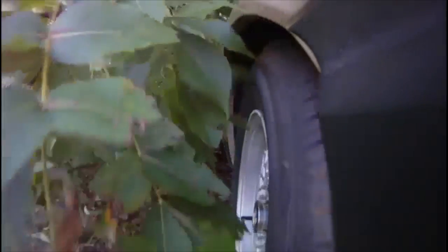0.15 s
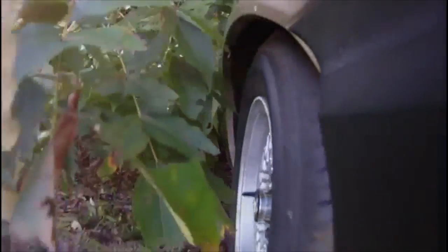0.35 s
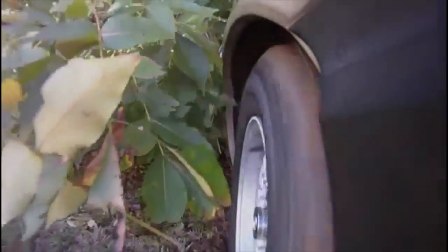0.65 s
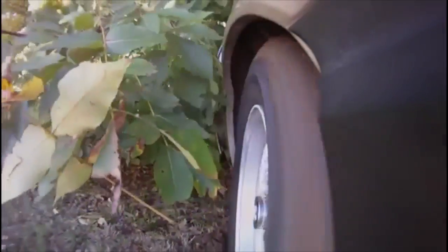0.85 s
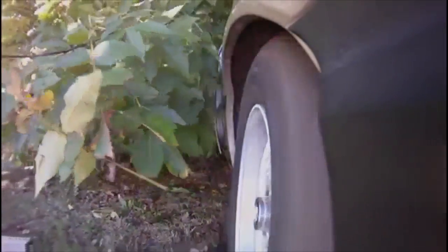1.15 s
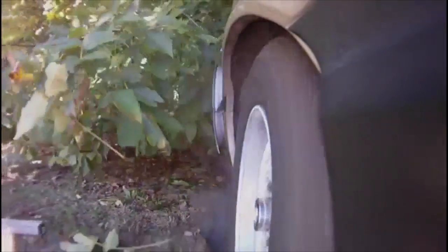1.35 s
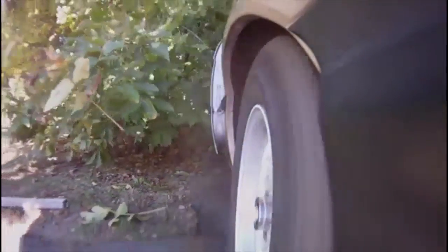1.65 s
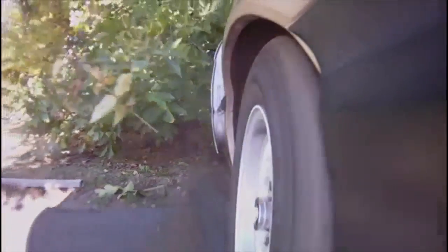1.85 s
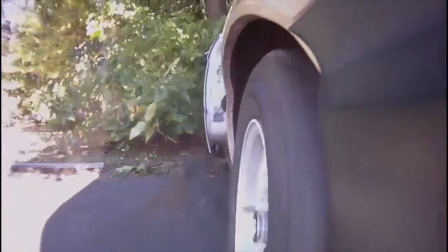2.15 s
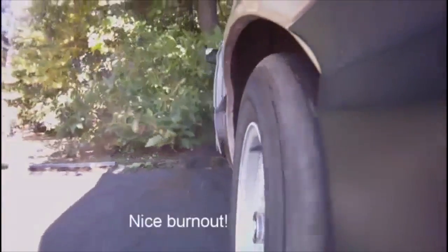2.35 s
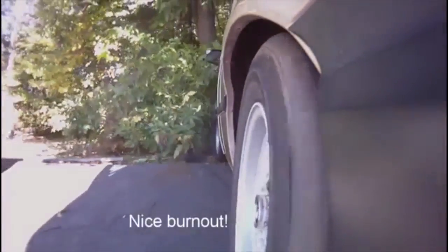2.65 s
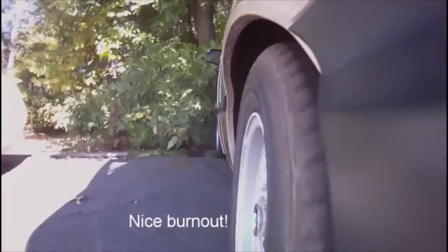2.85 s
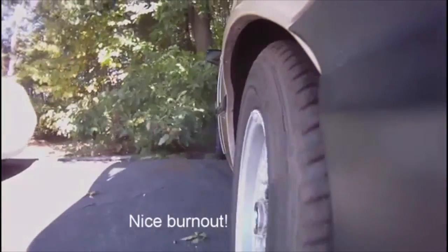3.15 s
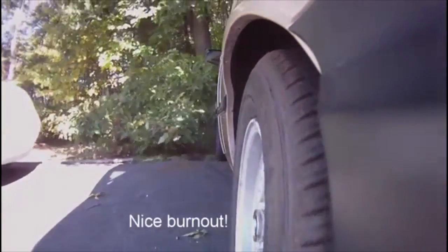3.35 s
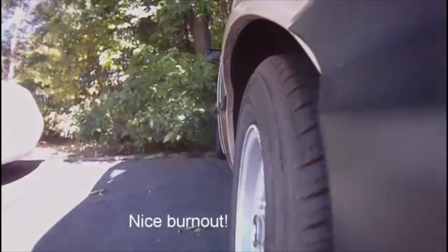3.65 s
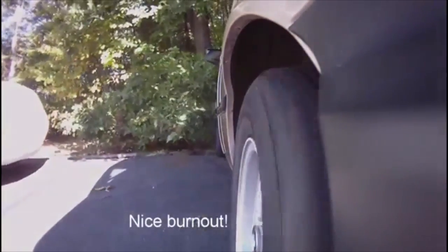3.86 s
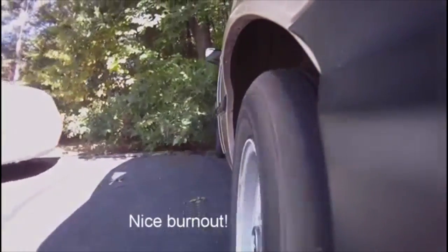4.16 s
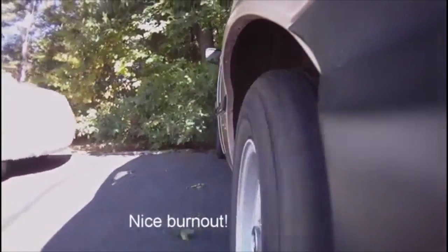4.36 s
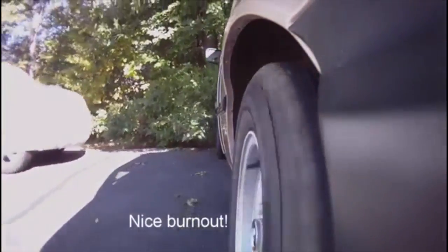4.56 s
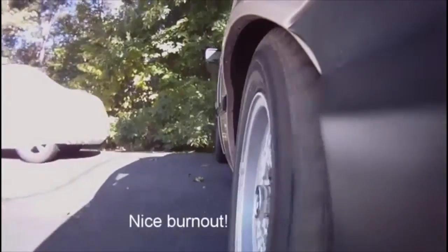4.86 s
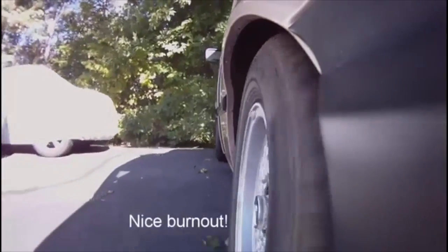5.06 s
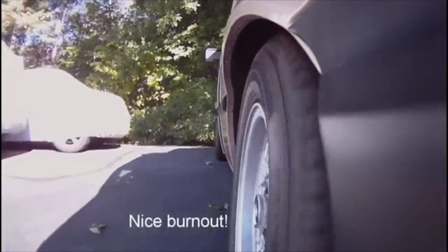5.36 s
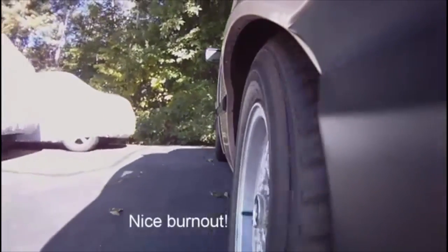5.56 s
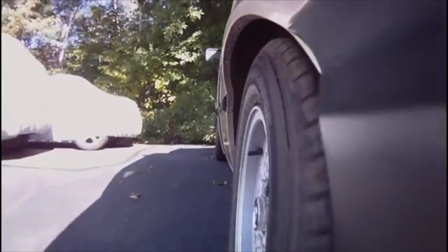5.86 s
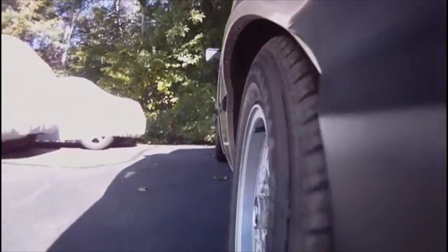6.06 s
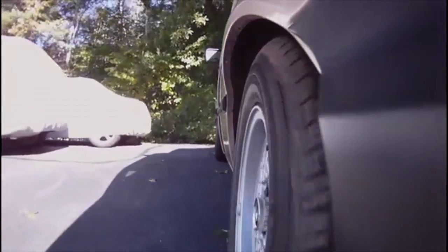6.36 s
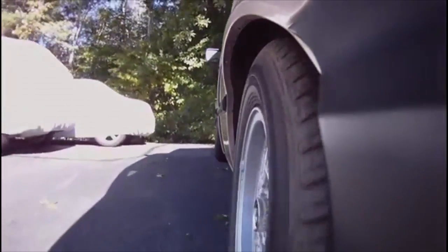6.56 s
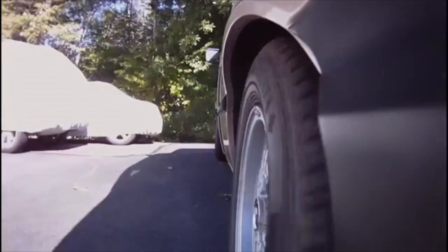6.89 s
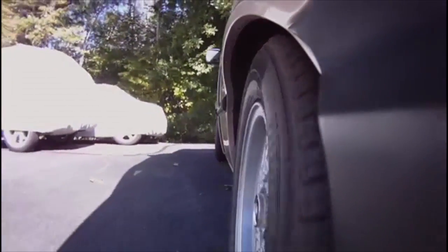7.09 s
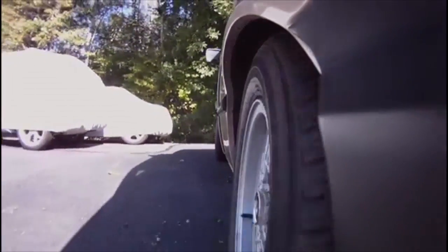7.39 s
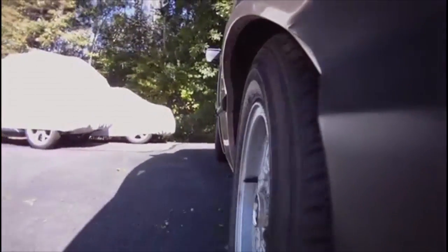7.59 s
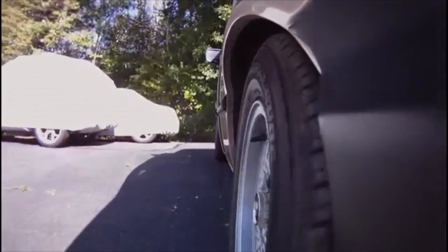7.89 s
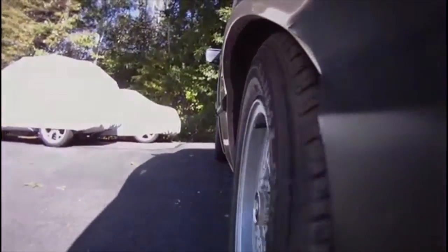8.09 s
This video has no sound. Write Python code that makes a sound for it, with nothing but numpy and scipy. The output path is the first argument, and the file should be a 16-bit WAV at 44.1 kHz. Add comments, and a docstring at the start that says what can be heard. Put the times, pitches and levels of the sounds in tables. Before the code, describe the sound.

A tyre loses grip twice on asphalt, with the microphone right by the wheel arch. Rumble and rasping rubber build into a piercing, unsteady, distorted squeal lasting about a second, ending in thumps and stone cracks. After a short lull comes a briefer, clearer squeal with a juddering start and finish. Then soft patchy grit crunch, faint whine, pump hum and hiss continue.

```python
"""Wheelspin on asphalt, heard just behind the wheel

An electric car's tread scrubs (grainy noise), then squeals (unsteady sines) and overloads the microphone.
A second, juddering squeal follows. Stones crack and ring; the car rolls over grit (patchy noise) with whine,
and motor and pump hum (harmonics) over rumble, deep rumble and hiss (filtered noise)."""
import sys
import numpy as np
from scipy import signal
from scipy.fft import rfft, irfft, next_fast_len
from scipy.io import wavfile

SR = 44100
rng = np.random.default_rng(int(sys.argv[2]) if len(sys.argv) > 2 else 0)


def unload_audio(sound):
    """Save the sound as a 16-bit wav file, at the path given as the first command line argument."""
    columns = np.transpose(np.atleast_2d(sound))
    # keep every value between -1 and 1, then stretch to whole-number steps
    steps = np.round(np.clip(columns, -1, 1) * 32767)
    wavfile.write(sys.argv[1], SR, steps.astype(np.int16))


N = 362943
TIME = np.arange(N) / SR
FULL_SLIDE_DB = -14  # reference slide strength

# strength of rolling on grit: start_s, level_db
ROLL_LEVEL = [(.33, -55), (.38, -47.5), (.55, -50.5), (.7, -37), (2.4, -40.5), (2.7, -46), (3.0, -43.5),
              (3.35, -55.5), (3.75, -57), (3.9, -37.5), (4.9, -39.5), (6.2, -45), (7.25, -41.5), (7.5, -47),
              (8.23, -47.5)]


def from_db(db):
    """Decibels to gain."""
    return 10 ** (np.asarray(db) / 20)


def rms_one(x):
    """Scale to unit power."""
    return x / np.sqrt(np.mean(x ** 2) + 1e-20)


def in_time(*tables):
    """Join tables end to end and interpolate each column at every sample."""
    s, *columns = np.vstack(tables).T
    return [np.interp(TIME, s, c) for c in columns]


def drift(corner_hz):
    """Smooth random signal of unit power, low-passed around corner_hz, made at SR / 16."""
    hz = np.arange(N // 32 + 1) * SR / (N // 16 * 16)
    spectrum = rfft(rng.standard_normal(N // 16))[:len(hz)]
    slow = irfft(spectrum / (1 + (hz / corner_hz) ** 2))
    return np.interp(np.arange(N) / 16, np.arange(len(slow)), rms_one(slow))


def noise(colour):
    """Noise of unit power with the given spectrum, falling away below its first point."""
    size = next_fast_len(N, real=True)
    hz, db = np.transpose(colour)
    bins_hz = np.maximum(np.arange(size // 2 + 1) * SR / size, 1)
    gain = from_db(np.interp(np.log(bins_hz), np.log(hz), db))
    gain = gain * np.minimum(bins_hz / hz[0], 1)
    return rms_one(irfft(rfft(rng.standard_normal(size)) * gain, size)[:N])


def resonances(modes):
    """Random friction rings narrow modes, each given as centre_hz, width_hz, level_db."""
    size = next_fast_len(N, real=True)
    bins_hz = np.arange(size // 2 + 1) * SR / size
    power = 0
    for hz, width_hz, db in modes:
        peak = rms_one(1 / (1 + ((bins_hz - hz) / width_hz) ** 2))
        power = power + from_db(2 * db) * peak ** 2
    return irfft(rfft(rng.standard_normal(size)) * np.sqrt(power), size)[:N]


def turn(hz):
    """Phase in radians of an oscillation whose frequency moves."""
    return 2 * np.pi * np.cumsum(hz) / SR


def slip(hz, spread):
    """Phase of rubber that sticks and slips at an unsteady rate."""
    return turn(hz * (1 + spread * (.6 * drift(18) + .8 * drift(162.75))))


def ring(push, hz, t60_s):
    """Two-pole resonator: a unit click starts a decaying sine of initial height 1."""
    r = from_db(-60 / (t60_s * SR))
    w = 2 * np.pi * hz / SR
    return signal.lfilter([0, np.sin(w)], [1, -2 * r * np.cos(w), r * r], push + 1e-18)


def swell(start_s, end_s, attack_s, release_s):
    """Gain that rises linearly, holds until the end and dies away exponentially."""
    rise = np.clip((TIME - start_s) / attack_s, 0, 1)
    return rise * np.exp(-np.maximum(TIME - end_s, 0) / release_s)


def arch(x):
    """Short reflections between road, wheel and arch comb the spectrum; power stays about the same."""
    # delay_s, gain (linear)
    reflections = [(.0023, -0.019), (.0037, -0.073), (.0061, 0.15), (.0094, -0.12), (0.0149, .2),
                   (0.0209, 0.037)]
    echoes = sum(gain * np.pad(x, (round(delay_s * SR), 0))[:N] for delay_s, gain in reflections)
    return (x + echoes) / np.sqrt(1 + sum(gain ** 2 for _, gain in reflections))


def slide_db():
    """How hard the rubber slides; drives scrub, squeal, rumble and motor."""
    # one table per wheelspin: start_s, level_db
    long_slide = [(.6, -61.5), (.82, -28.5), (1.06, -31), (1.36, -17), (1.6, -14), (2.07, -14),
                  (2.268, -21.5), (2.3, -34.5), (2.38, -45.5), (2.8, -57)]
    short_slide = [(3.77, -67), (3.822, -26.5), (3.972, -19.5), (4.288, -16.5), (4.49, -19.5),
                   (4.558, -26.5), (4.588, -42.5), (4.8, -69.5)]
    return in_time(long_slide, short_slide)[0]


def stick_slip_hz():
    """Stick-slip rate of the tread through both squeals."""
    # one table per squeal: start_s, pitch_hz
    spin_pitch = [(1.395, 1337), (1.426, 1092), (1.464, 1102), (1.544, 1228), (1.618, 1084), (1.685, 1201),
                  (1.83, 1113), (1.922, 1257), (2.034, 1072), (2.3, 1131)]
    hop_pitch = [(3.83, 1137), (4.097, 1159), (4.262, 1047), (4.31, 1077), (4.42, 1122), (4.499, 1107),
                 (4.578, 1175)]
    return in_time(spin_pitch, hop_pitch)[0]


def road_contact():
    """The tyre bounces as it loses or regains grip: a gain that dips at every hop."""
    # highest_hop_s, dip_db, dying_s (fade on both sides)
    judders = [(2.241, 17, 0.052), (3.87, 26, 0.11), (4.306, 3, 0.16), (4.525, 10.5, 0.055)]
    hop_period_s, hop_half_length_s = .071, 0.017
    dip_db = 0
    for s, db, dying_s in judders:
        from_hop_s = (TIME - s + hop_period_s / 2) % hop_period_s - hop_period_s / 2
        dying = ((TIME - s) / dying_s) ** 2
        hop = (from_hop_s / hop_half_length_s) ** 2
        dip_db = dip_db + db * np.exp(-dying - hop)
    return from_db(-dip_db)


def singing_tread():
    """Gains of fundamental, octave and neighbouring patches, and the share left as rasp."""
    # start_s, end_s, fundamental_db and octave_db (against the slide), fundamental_fade_db_per_s,
    # rasp_change_db, neighbours_db
    squeals = [(1.27, 1.37, 5.4, -3, 0, -0.5, -3), (1.408, 2.27, 10.65, 11, 12, -1.5, -2),
               (3.827, 4.558, 9.26, 7, 3.5, -5.5, -10)]
    attack_s, release_s = .025, .025
    first, second, crowd = 0, 0, 0
    rasp_db = -1.0  # outside the squeals
    for start_s, end_s, first_db, second_db, fade_db_per_s, change_db, crowd_db in squeals:
        on = swell(start_s, end_s, attack_s, release_s)
        fade_db = fade_db_per_s * np.clip(TIME - start_s, 0, end_s - start_s)
        first = first + on * from_db(first_db - fade_db)
        second = second + on * from_db(second_db)
        crowd = crowd + on * from_db(crowd_db)
        rasp_db = rasp_db + on * change_db
    return first, second, crowd, from_db(rasp_db)


def hiss(level_db=-62.5):
    """Steady background hiss: coloured noise."""
    # freq_hz, density_db (per Hz, relative)
    hiss_colour = [(700, 3.5), (4000, -8), (6000, -4.5), (10000, -0.5), (12000, -8.5), (15000, -17.5)]
    return from_db(level_db) * noise(hiss_colour)


def pump(pulse_hz=35.4, wander=.002, flutter_db=5.5):
    """A small pump at nearly steady speed: fluttering harmonics of its pulse rate."""
    # multiple (of pulse_hz), level_db (rms, before flutter)
    harmonics = [(3, -68.5), (4, -68.5), (5, -70.5), (7, -67), (8, -66.5), (10, -59.5), (11, -64.5),
                 (13, -69), (14, -61), (16, -64.5), (21, -72), (22, -76.5)]
    phase = turn(pulse_hz * (1 + wander * drift(1.8)))
    hum = 0
    for k, db in harmonics:
        gain = from_db(db + flutter_db * drift(1.6))
        hum = hum + gain * np.sin(k * phase + rng.uniform(0, 2 * np.pi))
    return np.sqrt(2) * hum


def rumble(lumpy_db=2.5, release_s=.06):
    """Rolling, sliding and lumpy jolts shake the carcass; a deep low swell sounds under the loudest squeal and
    at two thumps."""
    # freq_hz, density_db (per Hz, relative)
    rumble_colour = [(30, -23), (65, -13.5), (110, -2), (200, -2), (350, 1.5), (580, 2), (750, -8.5),
                     (950, -23), (2000, -42.5)]
    deep_colour = [(15, -7), (40, -2), (70, -7), (150, -15), (600, -16), (1150, -14.5), (1600, -51)]
    # tyre breaking loose, then biting again: start_s, end_s, attack_s, level_db
    jolt_rows = [(.7, 1.2, 0.47, -30.5), (2.485, 2.565, 0.013, -33.5)]
    # low swells: under the loudest squeal and at two thumps: start_s, end_s, attack_s, level_db
    low_swell_rows = [(1.416, 2.03, .35, -48), (2.48, 2.57, 0.052, -45), (8.114, 8.224, 0.076, -45)]
    usual_roll_db = -43
    # level at usual rolling / full slide, and the share of their swing that it follows
    roll_rumble_db, roll_follows = -49.5, 0.92
    slide_rumble_db, slide_follows = -37.5, 0.42

    def swells(rows):
        """Sum of the level swells in a table."""
        return sum(from_db(db) * swell(start_s, end_s, attack_s, release_s)
                   for start_s, end_s, attack_s, db in rows)

    jolted = swells(jolt_rows) * rms_one(from_db(lumpy_db * drift(30)))
    roll_db, = in_time(ROLL_LEVEL)
    rolled = from_db(roll_rumble_db + roll_follows * (roll_db - usual_roll_db))
    slid = from_db(slide_rumble_db + slide_follows * (slide_db() - FULL_SLIDE_DB))
    carcass = np.sqrt(rolled ** 2 + slid ** 2 + jolted ** 2) * noise(rumble_colour)
    return carcass + swells(low_swell_rows) * noise(deep_colour)


def rolling(grain_db=1.5, level_db=0.5, patchy_db=1.35, whine_flutter_db=4.0):
    """Tread crunches over patches of fine grit; drive and wheel whine along with it."""
    # freq_hz, density_db (per Hz, relative)
    roll_colour = [(600, -26), (900, -12.5), (1300, -8), (1600, -6), (2050, 2), (2900, -3.5), (3900, 0.5),
                   (4600, -1), (5200, -17), (6200, -13), (8200, -15), (10500, -18), (11800, -28.5),
                   (15000, -38.5)]
    # narrow tones: centre_hz, width_hz, level_db (against the rolling level, before flutter)
    whine_modes = [(1303, 11, -19), (1148, 10, -23), (2088, 16, -15), (2460, 12, -24.5), (3360, 12, -16.5),
                   (3770, 36, -10), (4446, 14, -26), (4400, 14, -23.5), (5380, 70, -20.5), (6140, 14, -30),
                   (9120, 70, -20.5), (9760, 12, -30.5)]
    texture = from_db(grain_db * drift(250) + patchy_db * drift(12))
    crunch = from_db(level_db) * rms_one(noise(roll_colour) * texture)
    whine = resonances(whine_modes) * from_db(whine_flutter_db * drift(3.7))
    return from_db(in_time(ROLL_LEVEL)[0]) * (arch(crunch) + whine)


def motor(octave_db=3.5, flutter_db=8.5, wander=0.03):
    """Gear teeth hum a note and its octave that follow the wheel speed, louder with harder sliding."""
    # start_s, pitch_hz (before wander)
    gear_note = [(.8, 118), (1.4, 360), (1.7, 432), (2.0, 391.6), (3.1, 170), (3.8, 166.2), (4.08, 301.3),
                 (4.3, 326.3), (4.46, 306), (4.75, 190)]
    full_slide_level_db, follows = -47.5, 0.65  # follows: share of the slide's swing
    hz, = in_time(gear_note)
    db = full_slide_level_db + follows * (slide_db() - FULL_SLIDE_DB)
    phase = turn(hz * (1 + wander * drift(25)))
    note = np.sin(phase) * from_db(flutter_db * drift(13))
    octave = np.sin(2 * phase) * from_db(octave_db + flutter_db * drift(26))
    return from_db(db) * (note + octave)


def stones(crack_s=0.0093, ring_t60_s=.03, level_db=5.0):
    """Stones crack against the wheel arch, which rings briefly at a pitch set by where each lands."""
    # start_s, peak_db (before level_db), ring_hz, ring_db (against the crack)
    stone_hits = [(.2154, -41.5, 4280, -6), (0.2452, -43, 1350, -2), (0.264, -35.5, 4080, 2.5),
                  (0.825, -19.5, 3140, 6), (0.889, -28, 2550, -6), (2.4935, -20, 4100, 2),
                  (2.5406, -27, 2360, 7), (2.9517, -37, 4160, 28), (3.6452, -39.5, 4130, 3),
                  (3.7769, -40.5, 2190, -17), (6.6393, -38, 7050, 0), (6.699, -37, 2220, 7),
                  (6.766, -43, 1900, 6)]
    # freq_hz, density_db (per Hz, relative)
    crack_colour = [(500, -25), (1000, -12), (1500, -0.5), (2400, 3), (3000, 4), (4000, -5), (5000, -3),
                    (10000, -9), (14000, -40)]
    out, grit = np.zeros(N), noise(crack_colour)
    age_s = np.arange(SR // 8) / SR
    for s, db, hz, ring_db in stone_hits:
        first = round(s * SR)
        span = slice(first, first + len(age_s))
        crack = grit[span] * np.exp(-age_s / crack_s)
        hit = rms_one(crack) + from_db(ring_db) * rms_one(ring(crack, hz, ring_t60_s))
        out[span] += from_db(db + level_db) * hit / np.abs(hit).max()
    return out


def squeaks(waver=.025):
    """Edges of the tread sing briefly before the whole patch lets go: short gliding sines."""
    # centre_s, length_s, start_hz, end_hz, peak_db
    squeak_rows = [(.92, 0.057, 5700, 6450, -33), (0.976, 0.14, 6030, 5430, -33.5),
                   (1.16, 0.0378, 6260, 5960, -31), (1.18, 0.045, 4580, 4380, -25)]
    out, unsteady = 0, 1 + waver * drift(207)
    for s, length_s, start_hz, end_hz, db in squeak_rows:
        hz = np.interp(TIME, [s - length_s / 2, s + length_s / 2], [start_hz, end_hz])
        envelope = np.exp(-(2 * (TIME - s) / length_s) ** 2)
        out = out + from_db(db) * envelope * np.sin(turn(hz * unsteady))
    return out


def scrub(grain_db=2.0, level_db=5.5, rib_flutter_db=4.5):
    """Rubber tears over the asphalt with a grainy rasp; what does not rasp sets ribs and tyre singing."""
    # freq_hz, density_db (per Hz, relative)
    scrub_colour = [(700, -12), (950, -16.5), (1400, -3.5), (1750, -4), (2400, 4.5), (2800, -3),
                    (3300, -1.5), (4100, 0.5), (4800, -16), (6500, -15), (9500, -24), (12500, -34),
                    (15500, -46.5)]
    # ribs beside the leading one: pitch_ratio, level_db (against the scrub), spread (factor for slip)
    tread_ribs = [(1.839, -8.5, .03), (2.1, -11.5, 0.049), (2.91, -3, .024)]
    # fixed tyre resonances: centre_hz, width_hz, level_db (against the scrub)
    tyre_modes = [(2380, 70, -5), (2570, 60, -7), (3170, 110, -7), (3900, 150, -9)]
    pitch_hz = stick_slip_hz()
    rasp = singing_tread()[-1]
    singing = np.sqrt(np.clip(2 * (1 - rasp ** 2), 0, 1))
    ribs = 0
    for ratio, db, spread in tread_ribs:
        tone = np.sin(slip(ratio * pitch_hz, spread))
        ribs = ribs + from_db(db) * rms_one(tone * from_db(rib_flutter_db * drift(40)))
    grains = from_db(level_db) * rms_one(noise(scrub_colour) * from_db(grain_db * drift(180)))
    return from_db(slide_db()) * arch(rasp * grains + singing * (ribs + resonances(tyre_modes)))


def squeal(crowd_db=-1.5, crowd_octave_db=1.0, crowd_spread=2.6, flutter_db=1.52,
           octave_flutter_db=3.0, count=3):
    """One patch of tread leads the stick-slip; its neighbours slip at stray rates and beat against it."""
    # tyre resonances that swell fundamental and octave: centre_hz, half_width_hz
    squeal_peaks = [(1116, 75), (2410, 165)]
    pitch_hz = stick_slip_hz()
    first, second, crowd_gain, _ = singing_tread()
    # blocks fall out of step with harder sliding and away from the lower resonance
    slide_disorder = 0.02143 * from_db(slide_db() - FULL_SLIDE_DB)
    detune_disorder = .2 * (pitch_hz / squeal_peaks[0][0] - 1)
    disorder = np.hypot(slide_disorder, detune_disorder)
    lead = turn(pitch_hz * (1 + disorder * 0.6034 * drift(141.0)))
    crowd = [slip(pitch_hz, disorder * crowd_spread) for _ in range(count)]
    partials = [(1, first, crowd_db, flutter_db), (2, second, crowd_octave_db, octave_flutter_db)]
    out = 0
    for k, gain, stray_db, shake_db in partials:
        peak_hz, half_width_hz = squeal_peaks[k - 1]
        resonance = 1 / np.hypot(1, (k * pitch_hz - peak_hz) / half_width_hz)
        strays = sum(np.sin(k * phase) for phase in crowd) / np.sqrt(count)
        mix = crowd_gain * from_db(stray_db)
        song = (np.sin(k * lead) + mix * strays) / np.hypot(1, mix)
        out = out + gain * resonance * rms_one(song * from_db(shake_db * drift(54)))
    return from_db(slide_db()) * out


def scene(squeal_dip_ratio=1.65):
    """Sum of all sources, dry; the squeal dips deeper at a hop than the scrub does."""
    contact = road_contact()
    background = hiss() + pump() + rumble()
    car = rolling() + motor() + stones()
    sliding = squeaks() + contact * scrub() + contact ** squeal_dip_ratio * squeal()
    return (background + car + sliding)[None]


def record(dry, gain_db=-2.5, cutoff_hz=15700):
    """Overload flattens the loudest peaks, then a zero-phase low-pass cuts the top."""
    clipped = np.clip(dry * from_db(gain_db), -1, 1)
    low_pass = signal.ellip(8, .05, 50, cutoff_hz, fs=SR, output="sos")
    return signal.sosfiltfilt(low_pass, clipped)


dry = scene()
out = record(dry)
unload_audio(out)
```